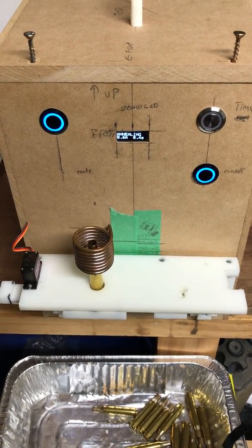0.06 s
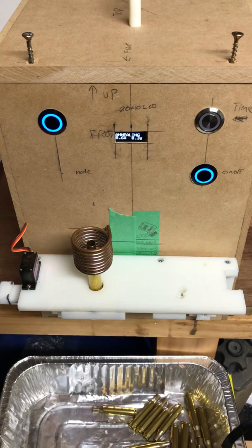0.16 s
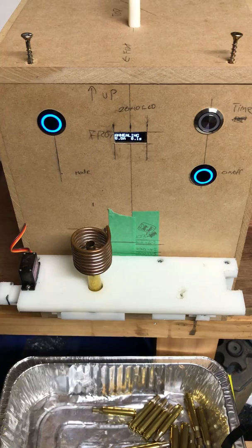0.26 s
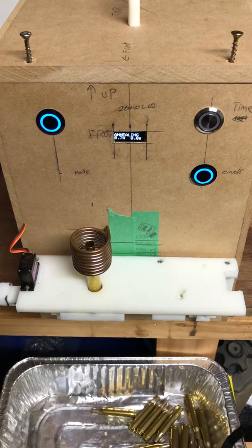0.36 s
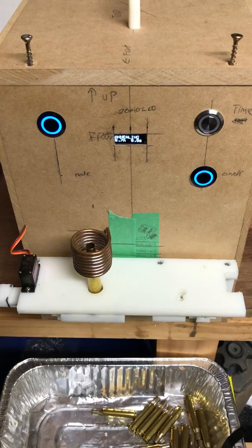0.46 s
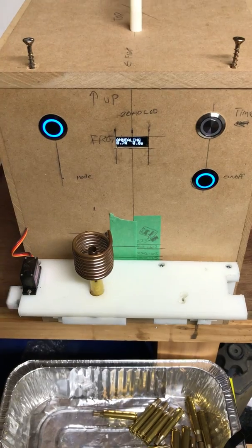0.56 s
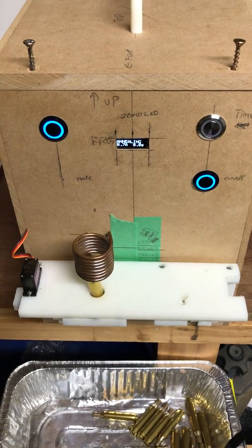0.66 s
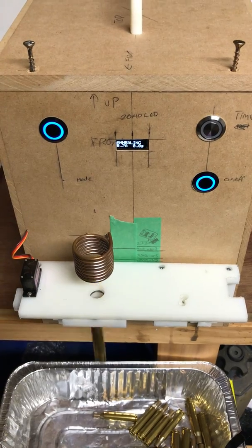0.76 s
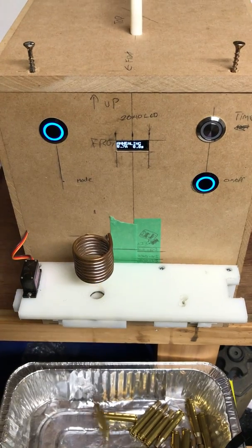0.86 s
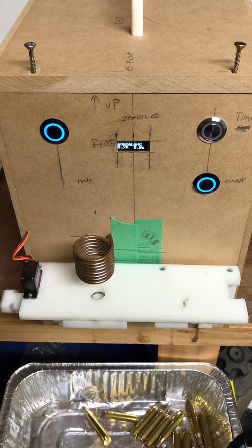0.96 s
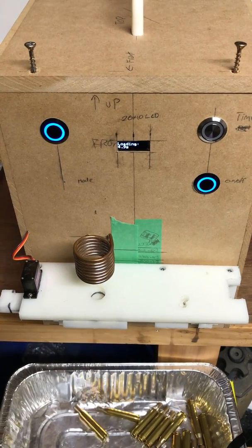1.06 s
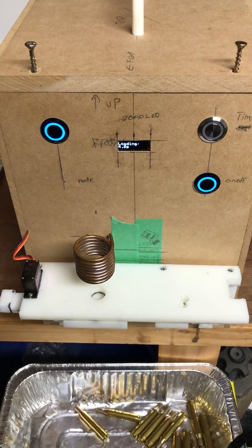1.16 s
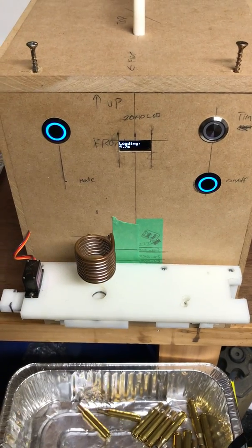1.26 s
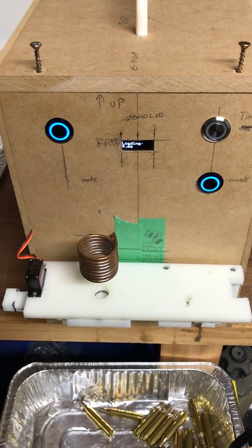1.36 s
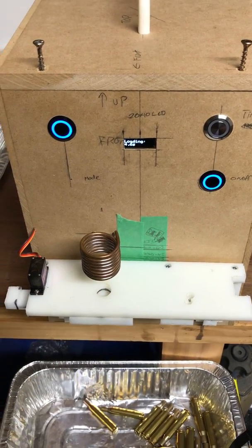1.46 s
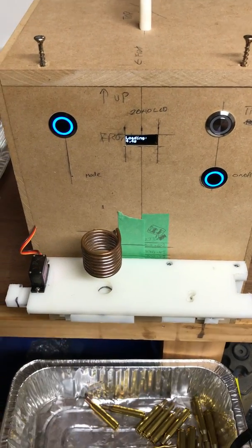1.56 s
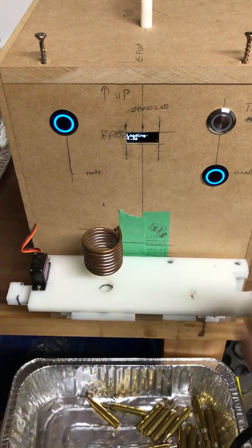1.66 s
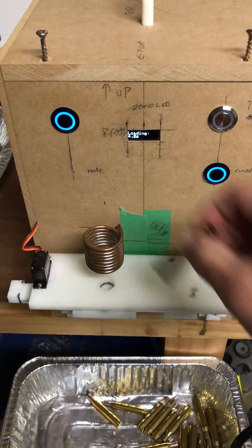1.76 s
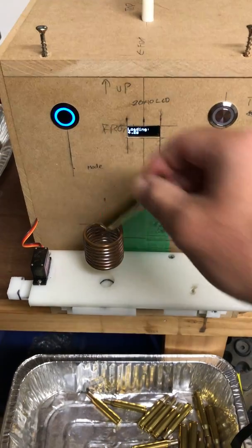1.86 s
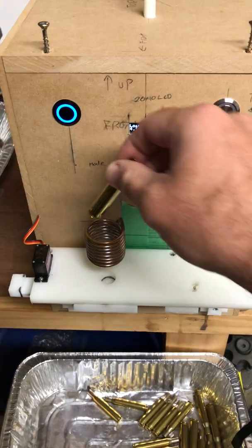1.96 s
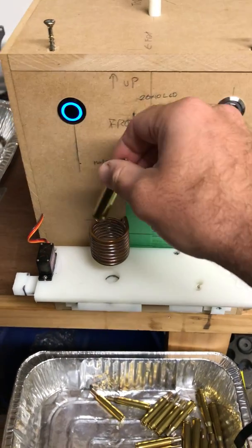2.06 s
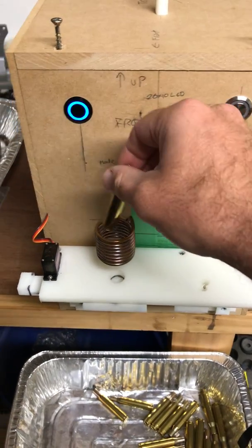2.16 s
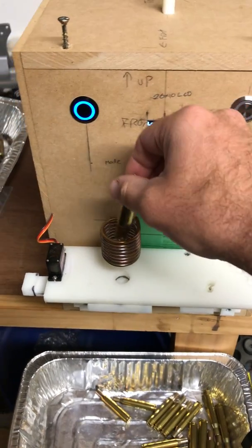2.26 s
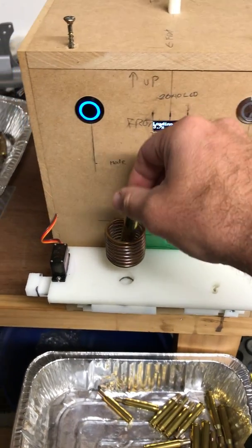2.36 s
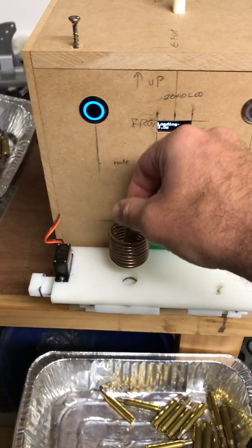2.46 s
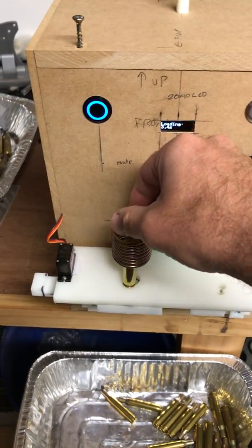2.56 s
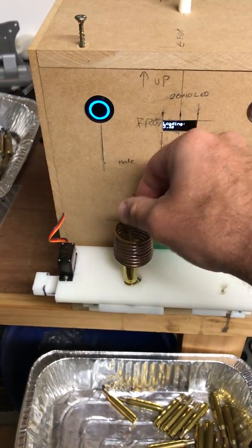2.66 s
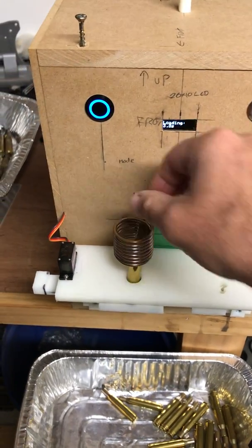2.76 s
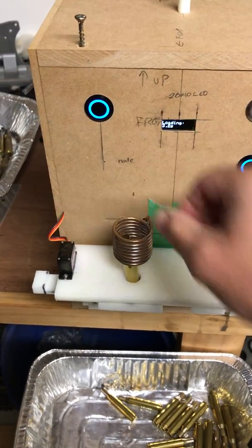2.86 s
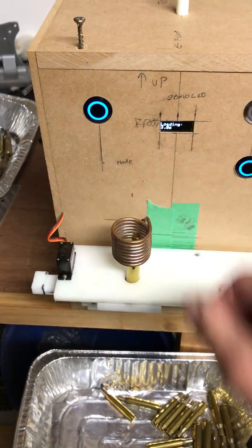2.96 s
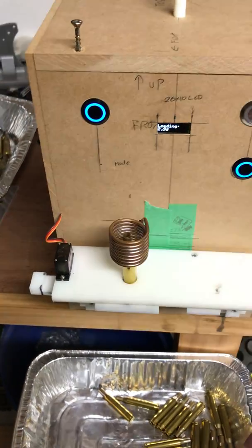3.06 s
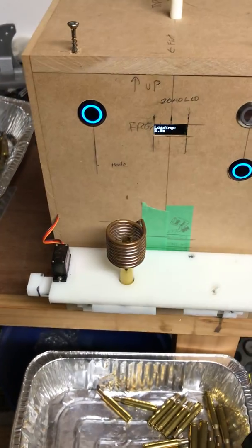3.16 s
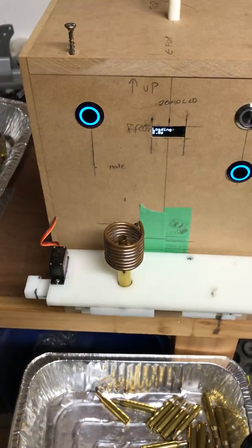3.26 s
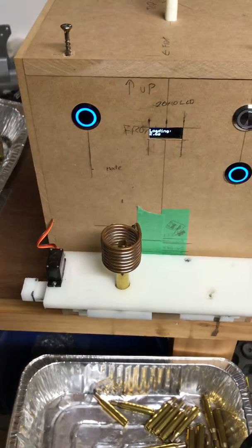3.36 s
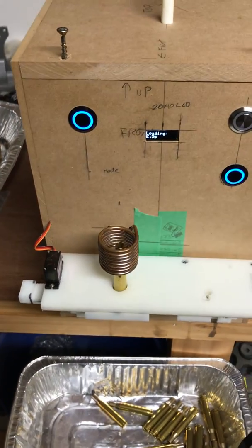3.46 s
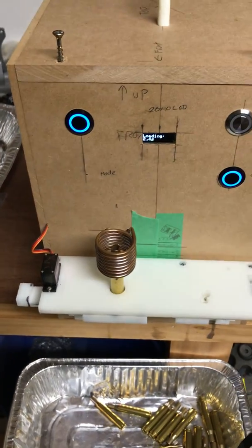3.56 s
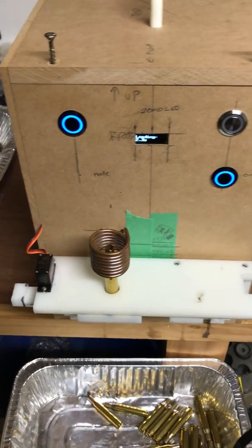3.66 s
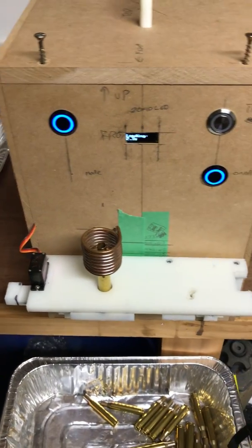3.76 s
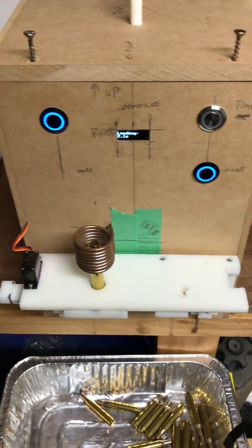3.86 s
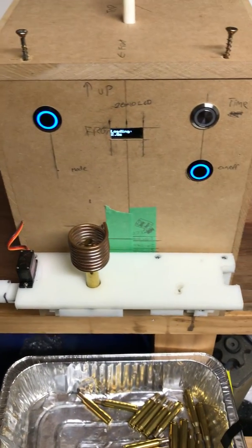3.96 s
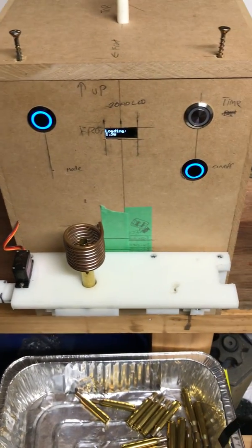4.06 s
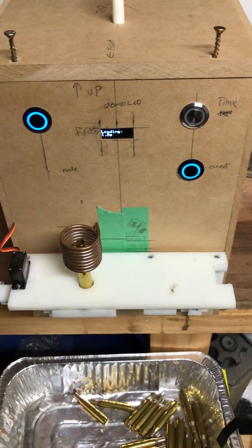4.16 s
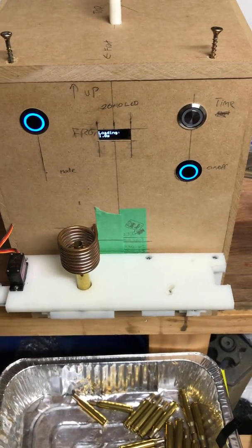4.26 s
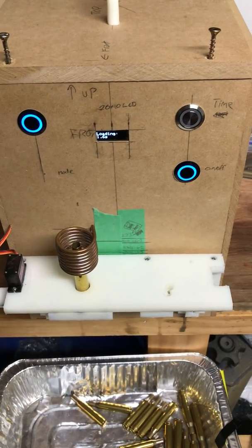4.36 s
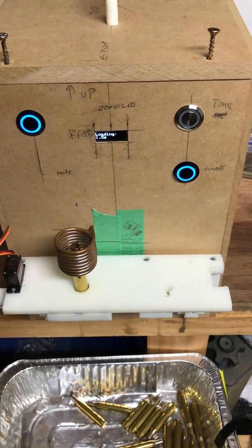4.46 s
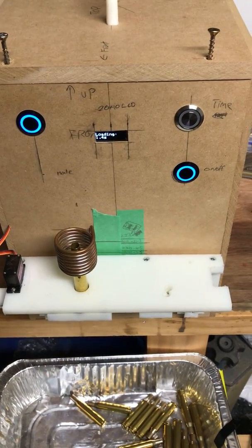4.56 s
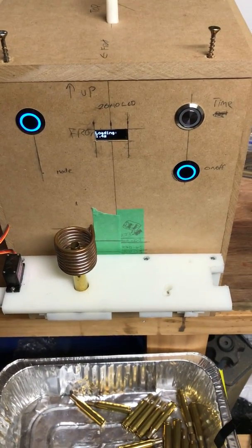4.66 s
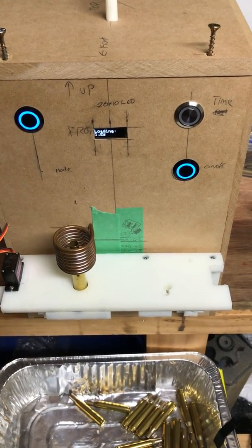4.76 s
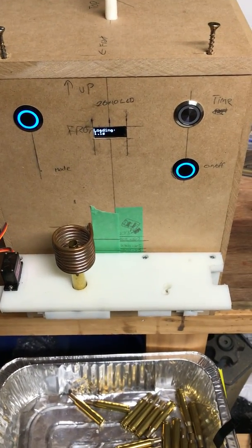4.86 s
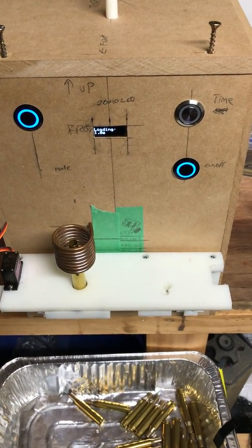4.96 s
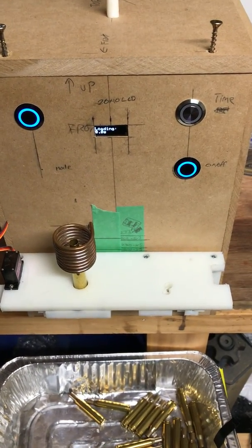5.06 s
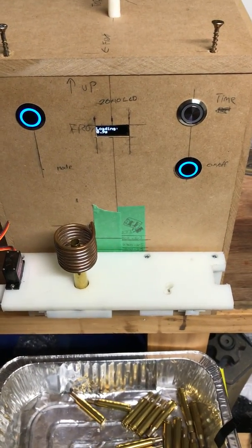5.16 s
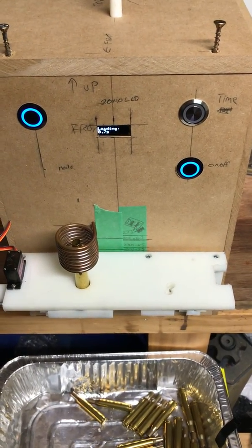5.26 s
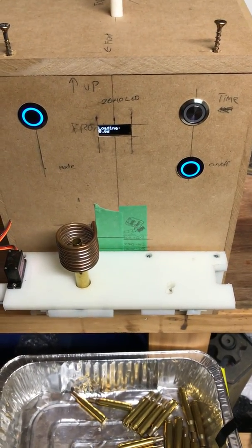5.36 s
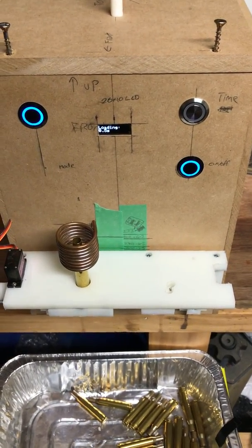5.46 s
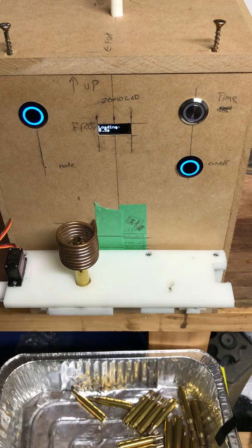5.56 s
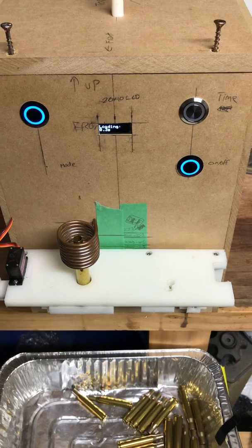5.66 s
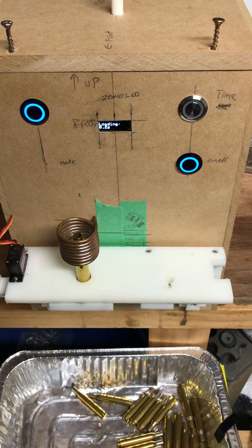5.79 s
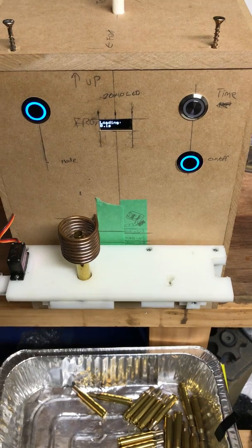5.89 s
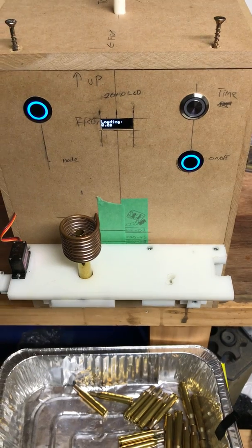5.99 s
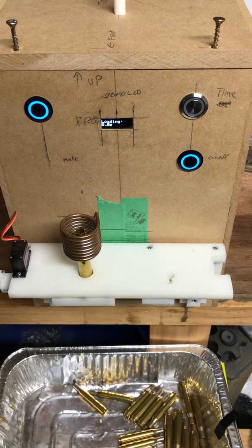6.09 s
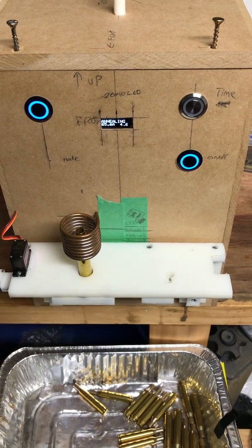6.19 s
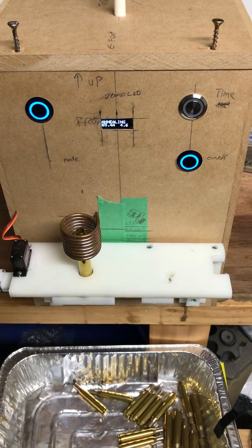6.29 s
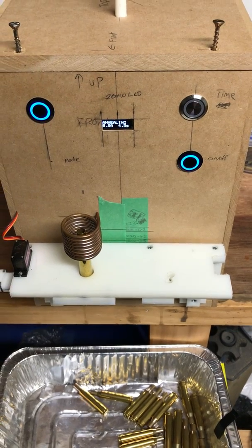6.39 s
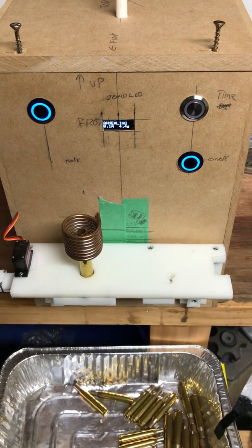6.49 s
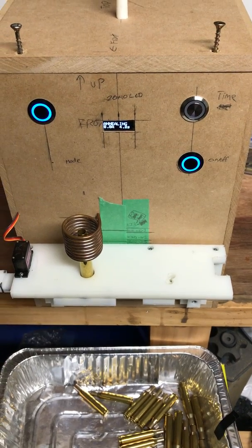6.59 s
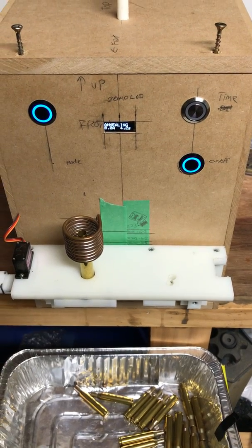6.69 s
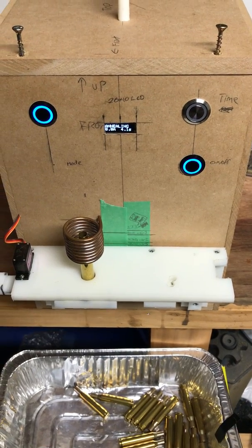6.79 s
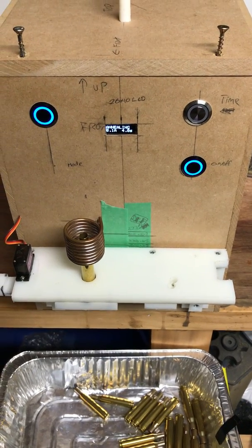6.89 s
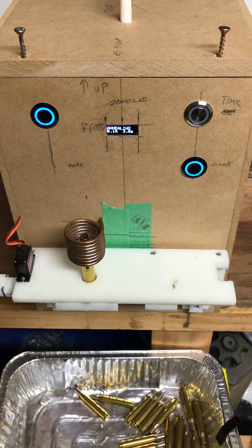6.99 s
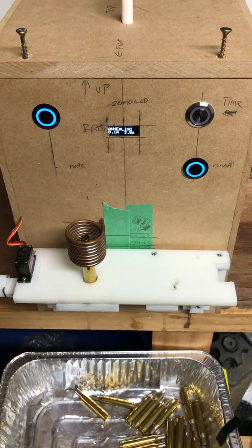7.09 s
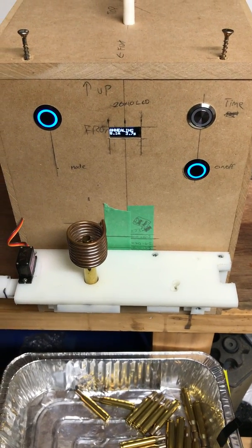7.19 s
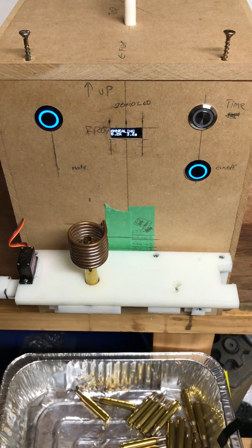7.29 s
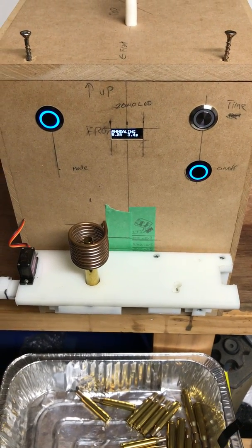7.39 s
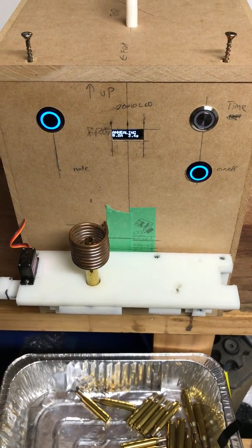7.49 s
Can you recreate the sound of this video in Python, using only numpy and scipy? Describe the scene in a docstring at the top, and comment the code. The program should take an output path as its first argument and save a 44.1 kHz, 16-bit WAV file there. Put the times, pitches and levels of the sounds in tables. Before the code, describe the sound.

A small servo motor whines and buzzes as it pulls a plastic gate aside. A brass cartridge case drops into a foil tray with a hollow, crackling boom and rattles to rest. Another case is fed in, knocking on plastic and a metal coil with a thin, high ring. Later a relay clicks once. A fan and pump hum steadily throughout, heard close up in a small workshop.

```python
"""A brass cartridge case drops into a foil tray, which booms and crackles as the case rattles to rest.
It falls from a home-made annealing (heat-softening) machine when a whining servo motor pulls a plastic
gate aside. The next case is fed by hand through the heating coil, ringing as it taps down onto the gate.
Later a relay clicks the heater on. A fan and a pump hum steadily behind it all in a small workshop."""
import sys
import numpy as np
from scipy import signal
from scipy.fft import rfft, irfft, next_fast_len
from scipy.io import wavfile
from scipy.ndimage import map_coordinates

SR = 44100
rng = np.random.default_rng(int(sys.argv[2]) if len(sys.argv) > 2 else 0)


def wav_out(sig):
    """Save sig, one row per channel (or a flat mono array), as 16-bit PCM at SR to the path in sys.argv[1]."""
    wavfile.write(sys.argv[1], SR, np.round(np.clip(np.atleast_2d(sig).T, -1, 1) * 32767).astype(np.int16))


N = 332205
TIME = np.arange(N) / SR
AGE = np.arange(SR) / SR  # seconds since a hit

# A mode is one tone a struck thing rings at; t60 is the time it takes to fade by 60 dB.
# Levels are relative: the functions scale them further.
# the falling case lands and bounces: t/s, boom level/dB, crackle level/dB, brass level/dB
LANDINGS = [(1.0003, -16.5, -19, -60), (1.0045, -18.5, -19, -60), (1.0096, -31, -15, -46),
            (1.0187, -31, -15.5, -28), (1.058, -30, -27, -20), (1.1102, -32.5, -33, -50),
            (1.1719, -43, -34, -64), (1.213, -39, -42, -44), (1.499, -70, -58.5, -82)]
# modes of the foil tray: f/Hz, level/dB, t60/s
TRAY_MODES = [(62, -26.5, .7), (76.3, -24, .4), (125.05, -15, 0.27), (167.05, -23, 0.23), (240, -14.5, .25),
              (262, -10, 0.4), (327, 4.5, .1), (340.3, -10.5, 0.6), (373, -8, 0.42), (509.1, -9, 0.13),
              (670, -13, .15), (711.2, -10, .16), (884, -5.5, .16), (1186, -18.5, .25), (1500, -19, 0.095),
              (1916, -23, .2), (2560, -19.5, 0.12), (3350, -17, 0.13)]
# the crumpled foil's countless small modes, as bands of noise: f/Hz, level/dB, t60/s
FOIL_BANDS = [(60, -20, 0.397), (130, -13, 0.45), (295, -7.5, 0.35), (686, -3.5, 0.17), (1402, -14.5, 0.39),
              (2800, -18, 0.63), (5957, -31, 0.76)]
# the crackle of a hit in the tray: f/Hz, level/dB, t60/s
CRACKLE_BANDS = [(602, -12, .04), (1500, -4, .04), (2820, -0.5, 0.039), (5700, -2, .035),
                 (8360, -6.5, 0.013), (14000, -7.5, .02)]
# the tray's ribs ringing: f/Hz, level/dB, t60/s
RIB_BANDS = [(1775, -7, 0.044), (2720, -6, 0.044), (3200, -1, 0.031), (4530, -24, 0.011)]
# the case skids, then rolls: start/s, end/s, rise/s, level/dB, swell/(dB per s), t60/s
SKIDS = [(1.01, 1.138, .02, -41, -10, 0.69), (1.333, 1.447, 0.072, -55.5, -1, 0.21)]
# brass scraping on foil: f/Hz, level/dB
SCRAPE_SPECTRUM = [(400, -17.5), (1500, 0.5), (3000, -2), (5000, -9.5), (7000, -11.5), (9000, -16),
                   (13000, -14.5), (16000, -22)]
# modes of the falling case, one in the pile and the fresh one: f/Hz, level/dB, t60/s, gap to twin/Hz
HOT_CASE_MODES = [(9680, -3.5, 0.29, 14), (8400, -18, .33, 16), (11150, -11, 0.36, 25),
                  (12730, -20, .15, 22), (14830, -6.5, .22, 11)]
PILE_CASE_MODES = [(9740, -2, 0.18, 4.5), (8200, -9, 0.17, 5.2), (9300, -13, .15, 9),
                   (10800, -31, 0.19, 12), (15000, -18, .2, 14)]
FRESH_CASE_MODES = [(9720, -4, 0.97, 2.3), (8419, -12, 0.61, 1.7), (11230, -3.5, 0.31, 14),
                    (14910, -2.5, .34, 17)]
# the fresh case taps its way down:
# t/s, knock level/dB, knock centre f/Hz, crack level/dB, first brass mode level/dB, other modes level/dB
FEED_TAPS = [(2.663, -8.5, 1170, -24, -44.5, -71), (2.7221, -26, 2420, -36, -43, -44),
             (2.8271, -24, 2310, -32, -30.5, -39.5), (2.865, -18, 1810, -38, -60.5, -46),
             (2.8841, -16.5, 1400, -20, -54, -53)]
# modes of the plastic gate, the wooden housing and the copper coil: f/Hz, level/dB, t60/s
GATE_MODES = [(815, -4.5, 0.012), (933.6, -3.5, 0.045), (1128, -4.5, 0.022), (1207, -4.5, 0.02),
              (1316, -5.5, 0.02), (1590, -7.5, 0.04), (1707, -1.5, 0.03), (2148, -5.5, 0.04),
              (2508, -11.5, 0.048)]
HOUSING_MODES = [(225, 1, 0.13), (367, 4.5, 0.046), (547, -5.5, 0.086)]
COIL_MODES = [(3150, -13, .025), (3420, -6, .03), (3970, 1.5, .04), (4220, -2, .035), (4620, -4, .025),
              (5230, -7, .02), (6400, -7, .018), (7090, -8, .018)]
# the sharp crack of a tap or knock: f/Hz, level/dB, t60/s
CRACK_BANDS = [(909, -4.5, .035), (2003, -5.5, .03), (4160, -2.5, 0.038), (6700, -6, 0.018),
               (9900, -14, .014), (14060, -11.5, .012)]
# the servo pulls the gate aside, then pushes it back: t/s, level/dB, swell/(dB per s)
SERVO_STROKES = [(.571, -36.5, 18), (.976, -35.5, -35.5)]
# the noise of turning gears: f/Hz, level/dB
GEAR_SPECTRUM = [(180, -54.5), (300, -20.5), (372, -1), (486, -25.5), (749, -15), (2100, -20.5),
                 (4160, -10), (4910, -7.5), (5430, -9.5), (9710, -12.5), (10900, -15.5), (12900, -6),
                 (16000, -28)]
# the whine sinks as the gate loads the gears: t/s, f/Hz
WHINE_PITCH = [(.62, 4304), (.657, 4174), (.674, 3570), (.698, 3210), (.713, 3170), (.716, 2822),
               (.729, 2744), (.738, 2208)]
# pitches that the gearbox makes louder: f/Hz, width/Hz, level/dB
GEARBOX_PEAKS = [(4314, 590, 1), (5600, 550, -2), (6880, 700, -3), (8700, 600, -9.5), (9653, 500, -1),
                 (12750, 1200, -5.5)]
# one twitch of the servo: f/Hz, level/dB, t60/s
TWITCH_BANDS = [(2900, -11, 0.071), (4470, -1, .06), (5000, -7.5, 0.037), (5630, -1.5, 0.075),
                (6180, -9, .05), (6817, -1.5, 0.032), (7560, -16, .03), (9600, -13, .04),
                (13500, -16, .015)]
# the gate knocks as it starts and stops: t/s, knock level/dB, crack level/dB
GATE_KNOCKS = [(.574, -22.5, -27.5), (0.7371, -41.5, -30.5), (0.802, -31, -43.5), (.819, -39, -51)]
# modes of the servo's arm and slide: f/Hz, level/dB, t60/s
ARM_MODES = [(190, -16, .09), (800, -12, .04), (950, -7, .045), (1220, -1, .04), (1430, -3, .04),
             (1750, -1, .04), (1960, -1, .035)]
# the relay's moving arm hits and rebounds: t/s, snap level/dB, ring level/dB
RELAY_HITS = [(6.318, -38.5, -41), (6.3202, -41, -25.5)]
# the relay's snap and the modes of its frame: f/Hz, level/dB, t60/s
SNAP_BANDS = [(1400, -8, 0.042), (2980, -2.5, 0.049), (4380, -8, 0.012), (5720, -10, 0.044),
              (6500, 3, 0.026), (7040, -13, 0.019), (9000, -10, 0.038), (12536, -2.5, 0.022),
              (15700, 1, 0.018)]
RELAY_MODES = [(740, -13, .06), (860, -5, .05), (940, -4.5, .055), (1035, -2.5, .085), (1473, 1.5, .13),
               (1590, -11, .07), (1700, -13, .04)]
# brushing skin: f/Hz, level/dB
SKIN_SPECTRUM = [(400, -25), (1400, 3), (3500, -1.5), (8000, -4), (13000, -2.5), (16000, -3)]
# the hum of fan and pump, and the air the fan moves: f/Hz, level/dB
HUM_TONES = [(44.5, -61.5), (87.5, -69.5), (134.5, -60), (195.2, -48.5), (269, -56.5), (540, -73),
             (587, -69), (893, -71.5), (1114, -73.5)]
AIR_SPECTRUM = [(25, -28), (60, -11.5), (100, -11), (150, -7), (205, 3), (290, -7.5), (385, -7),
                (460, -22.5), (620, -18), (1050, -20.5), (1600, -30), (3000, -39.5), (7000, -48),
                (15500, -49.5)]
# the workshop's echo: f/Hz, level/dB, t60/s
ROOM_BANDS = [(200, -14.5, 0.55), (600, -4.5, .45), (1500, -5.5, .5), (3500, -1.5, 0.38), (7000, 0.5, 0.3),
              (13980, 0.5, 0.093)]


def tray():
    """The case booms on the thin foil, bounces, rings, skids and rocks to rest against the others."""
    skids = sum(amp(db) * envelope(s, end, rise, swell, t60) for s, end, rise, db, swell, t60 in SKIDS)
    out = skids * unit(amp(4.7 * wobble(300))) * noise(SCRAPE_SPECTRUM)
    boom = ring(TRAY_MODES, scatter_db=2.5)
    age = lifetime(TRAY_MODES)
    hops = rocking(count=8)
    light_hits = rattle(count=8) + [(s, -44.5 - k) for k, s in enumerate(hops)]  # each hop loses 1 dB
    hits = [row[:3] for row in LANDINGS] + [(s, db - 4, db) for s, db in light_hits]
    for s, boom_db, crackle_db in hits:
        retune = 1 + .02 * rng.normal()  # the foil bends under each hit, shifting its pitch
        add(out, s, amp(boom_db) * np.interp(retune * age, age, boom))
        add(out, s, amp(boom_db - .5) * burst(FOIL_BANDS))
        add(out, s, amp(crackle_db) * burst(CRACKLE_BANDS))
    brass_hits = [(s, db, db) for s, _, _, db in LANDINGS]
    ringing = brass(HOT_CASE_MODES, brass_hits, twin_gain=.15, tumble_db=4, jostle=.8)
    add(out, LANDINGS[0][0], ringing.sum(axis=0))
    for k, s in enumerate(hops):
        add(out, s, amp(-35.5 - 3 * k) * burst(RIB_BANDS))
    slip_s = 1.5915  # a case in the pile slips with a last faint tink
    tink = brass(PILE_CASE_MODES, [(slip_s, -49, -49)], twin_gain=.2, tumble_db=1, jostle=.3)
    add(out, slip_s, tink.sum(axis=0))
    add(out, slip_s, amp(-57.5) * burst(CRACKLE_BANDS))
    return out


def rattle(count, start_s=1.06, end_s=1.24, fall_db_per_s=57.5):
    """Light, uneven hits follow the landing and die away; gives rows of t/s, level/dB."""
    ages = (np.arange(count) + rng.random(count)) / count * (end_s - start_s)
    return [(start_s + age, -33 - fall_db_per_s * age + 2.5 * rng.normal()) for age in ages]


def rocking(count, start_s=1.279, first_hop_s=.05, shrink=.71, shortest_s=.0128):
    """The case rocks on the tray's ribs in hops that quicken into a chatter; gives their times."""
    flights = np.maximum(first_hop_s * shrink ** np.arange(count - 1), shortest_s)
    return start_s + np.append(0, np.cumsum(flights))


def brass(modes, hits, twin_gain, tumble_db, jostle):
    """A case's thin wall rings, each hit adding energy; gives one row per mode, from the first hit on."""
    start = min(row[0] for row in hits)
    rows = []
    for k, (hz, db, t60, gap_hz) in enumerate(modes):
        energy, decay = np.zeros(SR), fade(AGE, t60) ** 2
        for s, first_db, others_db in hits:
            add(energy, s - start, amp(others_db if k else first_db) ** 2 * decay)
        tone = np.sin(2 * np.pi * hz * AGE + jostle * wobble(120)[:SR])  # light touches unsettle it
        # a slightly oval case gives each mode a close twin, and the two throb together
        twin = twin_gain * np.sin(2 * np.pi * (hz + gap_hz) * AGE)
        gain = amp(db + tumble_db * wobble(70)[:SR])  # louder and softer as the case turns
        rows.append(gain * np.sqrt(energy) * (tone + twin))
    return np.array(rows)


def fresh_case(seated_s=2.886):
    """The next case taps the coil and the gate, shakes the housing and rings on between the taps."""
    out, housing = np.zeros(N), np.zeros(N)
    for s, knock_db, centre_hz, crack_db, _, _ in FEED_TAPS:
        # where the case lands decides which of the gate's modes answer most
        struck = [(hz, db - 12 * np.log2(hz / centre_hz) ** 2, t60) for hz, db, t60 in GATE_MODES]
        add(out, s, amp(knock_db) * ring(struck, scatter_db=-.5))
        thump_db = crack_db - 4 - 21.5 * np.log2(centre_hz / 1200)  # higher knocks shake the wood less
        add(housing, s, amp(thump_db) * ring(HOUSING_MODES, scatter_db=2.5))
        add(out, s, amp(crack_db) * burst(CRACK_BANDS))
        add(out, s, amp(crack_db - .5) * ring(COIL_MODES, scatter_db=1.5))
    start = FEED_TAPS[0][0]
    hits = [(row[0], *row[-2:]) for row in FEED_TAPS]
    first_mode, *others = brass(FRESH_CASE_MODES, hits, twin_gain=.3, tumble_db=3.5, jostle=.2)
    choke = fade(np.maximum(start + AGE - seated_s, 0), .29)  # standing on plastic mutes the first mode
    add(out, start, first_mode * choke + sum(others))
    return cut_bass(out + housing, hz=150, order=2)  # the small housing gives off little bass


def servo(stroke_s=.194):
    """The motor's gears rasp on both strokes and whine while they pull the gate."""
    whine = gear_whine()
    drive = sum(amp(db) * envelope(s, s + stroke_s, .003, swell, .035) for s, db, swell in SERVO_STROKES)
    teeth = unit(amp(.83 * wobble(700)))  # a fast flutter in level
    return teeth * (drive * noise(GEAR_SPECTRUM) + whine)


def gear_whine():
    """A rough, sinking tone whose overtones flare as they pass the pitches the gearbox favours."""
    pitch = np.interp(TIME, *np.transpose(WHINE_PITCH))
    phase = 2 * np.pi * np.cumsum(pitch * (1 + .01 * wobble(900))) / SR
    whine = np.zeros(N)
    for k in range(1, 5):
        gain = sum(amp(db) / (1 + (2 * (k * pitch - hz) / width) ** 2) for hz, width, db in GEARBOX_PEAKS)
        rasp = .75 * wobble(1100)  # uneven teeth smear each overtone
        whine += (gain + .12) * np.sin(k * phase + rasp)
    return whine * amp(-29) * envelope(.614, .742, rise_s=.016, swell_db_per_s=45, t60=.064)


def servo_hold(start_s=.7815, pulse_s=.01995, growth_db_per_s=25):
    """Holding the gate open, the servo buzzes and twitches at each control pulse, more as it strains."""
    end_s = SERVO_STROKES[1][0]
    buzz = noise([(TWITCH_BANDS[0][0] / 2, -40)] + [row[:2] for row in TWITCH_BANDS])
    out = amp(-59) * envelope(start_s, end_s, rise_s=.003, swell_db_per_s=0, t60=.035) * buzz
    for s in np.arange(start_s, end_s, pulse_s):
        db = -52 + growth_db_per_s * (s - start_s) + .5 * rng.normal()
        add(out, s, amp(db) * burst(TWITCH_BANDS))
    return out


def gate():
    """The loose plastic slide knocks as it takes up its slack."""
    out = np.zeros(N)
    for s, knock_db, crack_db in GATE_KNOCKS:
        add(out, s, amp(knock_db) * ring(ARM_MODES, scatter_db=2.5))
        add(out, s, amp(crack_db) * burst(CRACK_BANDS))
    return out


def relay():
    """The switch shuts with a bright snap that carries into the room, and its frame rings briefly."""
    snap, frame = np.zeros(N), np.zeros(N)
    for s, snap_db, ring_db in RELAY_HITS:
        add(snap, s, amp(snap_db) * burst(SNAP_BANDS))
        add(frame, s, amp(ring_db) * ring(RELAY_MODES, scatter_db=.5))
    return workshop(snap, echo_db=-14) + workshop(frame, echo_db=-24)


def hand():
    """The hand makes a soft, grainy brush as it draws back."""
    stroke = envelope(3.412, 3.51, rise_s=.0077, swell_db_per_s=-66, t60=.18)
    return stroke * amp(-56.5 + 1.3 * wobble(200)) * noise(SKIN_SPECTRUM)


def fan_and_pump():
    """Slightly unsteady humming tones over rushing air."""
    hum = sum(amp(db + .41 * wobble(7)) * np.sin(2 * np.pi * hz * TIME + .45 * wobble(3.6))
              for hz, db in HUM_TONES)
    return hum + amp(-52) * noise(AIR_SPECTRUM)


def workshop(x, echo_db):
    """Add the room's short echo, which builds up as the first reflections arrive."""
    tail = burst(ROOM_BANDS) * (1 - np.exp(-lifetime(ROOM_BANDS) / .0021))
    return x + amp(echo_db) * signal.oaconvolve(x, tail / np.linalg.norm(tail))[:N]


def ring(modes, scatter_db, contact_s=.0005):
    """The fading tones of a struck thing, at slightly new strengths on each call."""
    t = lifetime(modes)
    tones = sum(amp(db + scatter_db * rng.normal()) * fade(t, t60) * np.sin(2 * np.pi * hz * t)
                for hz, db, t60 in modes)
    return tones * (1 - np.exp(-t / contact_s))


def burst(bands):
    """Noise in overlapping bands, each dying at its own speed."""
    t = lifetime(bands)
    white = rfft(rng.standard_normal(SR)[:len(t)])
    pitch = np.log(np.fft.rfftfreq(len(t), 1 / SR) + 1)
    centres = np.log([bands[0][0] / 2] + [row[0] for row in bands] + [bands[-1][0] * 2])
    shares = np.eye(len(centres))[1:-1]  # each band peaks at its centre and ends at its neighbours'
    return sum(unit(irfft(white * np.interp(pitch, centres, share), len(t))) * amp(db) * fade(t, t60)
               for share, (_, db, t60) in zip(shares, bands))


def noise(spectrum):
    """Steady noise of strength 1, shaped by rows of f/Hz, level/dB."""
    hz, db = np.transpose(spectrum)
    size = next_fast_len(N)
    pitch = np.log(np.fft.rfftfreq(size, 1 / SR) + 1)
    colour = amp(np.interp(pitch, np.log(hz), db))
    return unit(irfft(rfft(rng.standard_normal(size)) * colour)[:N])


def wobble(rate):
    """A smooth curve through `rate` random points a second."""
    points = rng.standard_normal(N // 20)
    steps = np.arange(8 * (int(N * rate / SR) + 2)) / 8
    return np.interp(TIME * rate, steps, map_coordinates(points, [steps]))


def envelope(start, end, rise_s, swell_db_per_s, t60):
    """A loudness curve that rises at `start`, swells or sags until `end`, then fades."""
    rise = np.clip((TIME - start) / rise_s, 0, 1)
    held = np.clip(TIME, start, end) - start
    return rise * amp(swell_db_per_s * held) * fade(np.maximum(TIME - end, 0), t60)


def fade(t, t60):
    """Die away by 60 dB every t60 seconds."""
    return np.exp(-np.log(1000) * t / t60)


def lifetime(modes):
    """Seconds since a hit, for as long as the slowest mode sounds (1 s at most)."""
    return AGE[:next_fast_len(int(1.3 * SR * max(row[2] for row in modes)))]


def add(track, s, sound):
    """Mix a sound into the track at s seconds."""
    part = track[round(s * SR):][:len(sound)]
    part += sound[:len(part)]


def cut_bass(x, hz, order):
    """Turn down everything below hz; a higher order cuts more steeply."""
    return signal.sosfilt(signal.butter(order, hz, "highpass", fs=SR, output="sos"), x)


def amp(db):
    """Turn decibels into a multiplier."""
    return 10 ** (np.asarray(db) / 20)


def unit(x):
    """Scale to an average strength (rms) of 1."""
    return x / np.sqrt(np.mean(x ** 2) + 1e-20)


def scene():
    """Everything on the bench, heard from close by in one channel."""
    machine = workshop(servo() + servo_hold() + gate(), echo_db=-15.5)
    cases = workshop(tray(), echo_db=-13.5) + workshop(fresh_case(), echo_db=-17)
    return (cases + machine + relay() + workshop(hand(), echo_db=-20) + fan_and_pump())[None]


def record(dry, peak_limit=.8, top_hz=15900):
    """Drop the deepest bass, round off the peaks and cut the highest treble."""
    heard = cut_bass(dry, hz=42, order=4)
    rounded = heard / (1 + (heard / peak_limit) ** 4) ** (1 / 4)
    return signal.oaconvolve(rounded, signal.firwin(301, top_hz, fs=SR)[None], mode="same")


dry = scene()
out = record(dry)
wav_out(out)
```